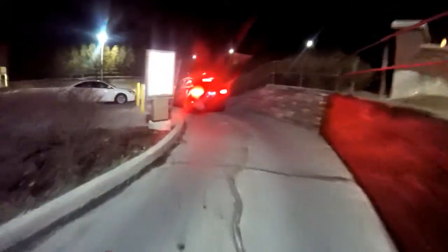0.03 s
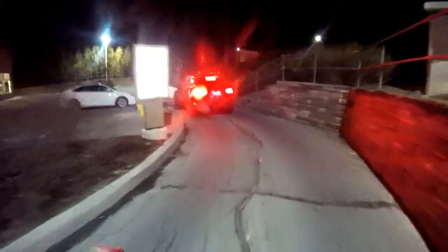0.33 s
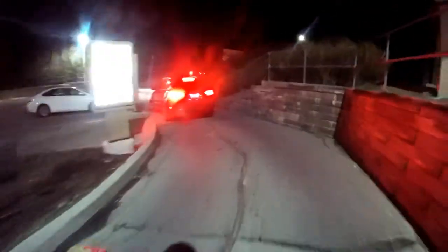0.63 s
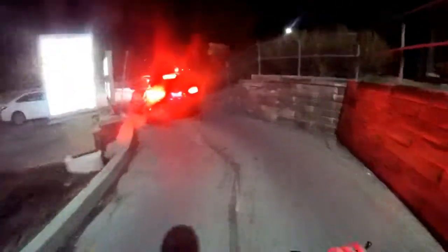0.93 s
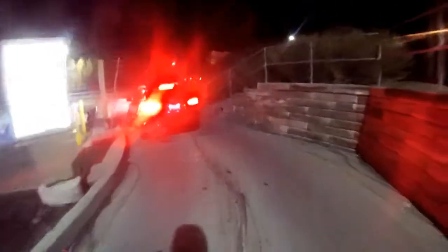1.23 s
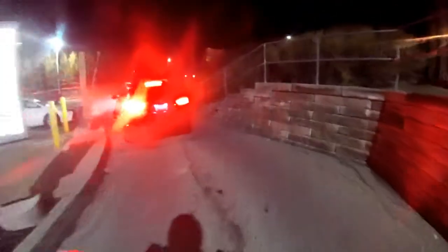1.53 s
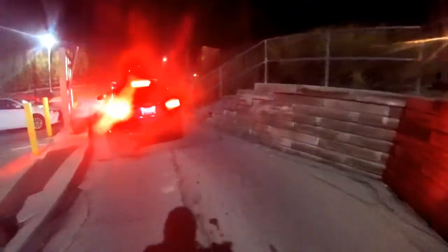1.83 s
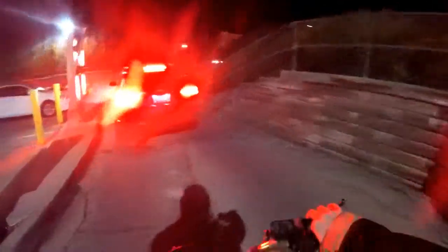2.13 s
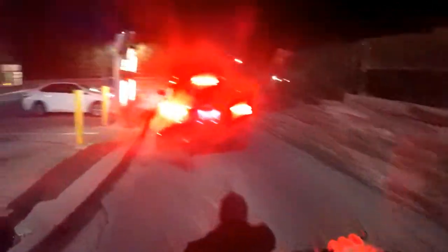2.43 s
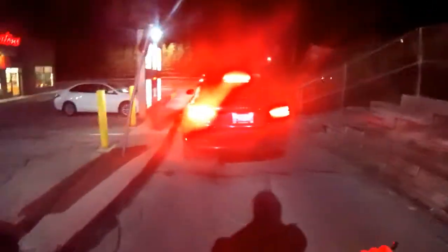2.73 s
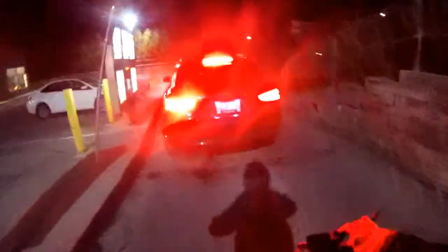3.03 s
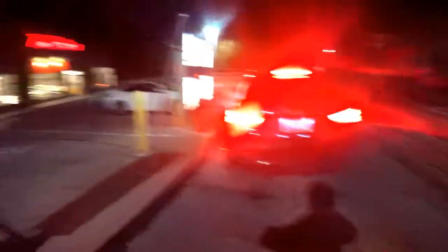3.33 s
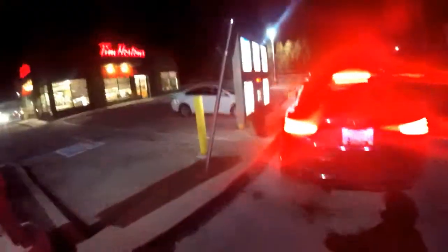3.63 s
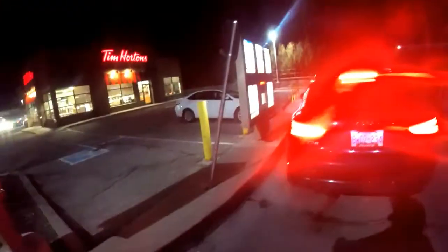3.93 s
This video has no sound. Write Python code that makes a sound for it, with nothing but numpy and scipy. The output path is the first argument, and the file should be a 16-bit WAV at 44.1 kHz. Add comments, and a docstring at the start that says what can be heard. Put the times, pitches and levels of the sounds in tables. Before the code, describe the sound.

A small motorbike engine ticks and rumbles, slowing towards idle as it rolls along.

```python
"""Motorbike in a lane

A small single-cylinder four-stroke rolls up a lane, revs sinking towards idle; microphone close, on
the rider's helmet. The case clatters, the crank throbs, air rumbles on the microphone, the exhaust
thuds unevenly, and once a cycle the valve gear gives a run of bright ticks. The frame bumps over road
joints, the drive gives one sharp clack, and late on the running gear squeaks faintly."""
import sys
import numpy as np
from scipy import signal
from scipy.fft import rfft, irfft
from scipy.io import wavfile
from scipy.ndimage import map_coordinates

SR = 44100
rng = np.random.default_rng(int(sys.argv[2]) if len(sys.argv) > 2 else 0)


def wav_out(sig):
    """Save sig, one row per channel (or a flat mono array), as 16-bit PCM at SR to the path in sys.argv[1]."""
    wavfile.write(sys.argv[1], SR, np.round(np.clip(np.atleast_2d(sig).T, -1, 1) * 32767).astype(np.int16))


N = 176400
TIME = np.arange(N) / SR
VALVES_OPEN, FIRES_AT = .325, .79  # shares of an engine cycle, from the first valve tick


def amp(db):
    """Decibels to gain."""
    return 10 ** (np.asarray(db) / 20)


def unit(x):
    """Scales to rms 1."""
    return x / np.sqrt(np.mean(x ** 2) + 1e-20)


def level(points):
    """A curve of dB over time as a gain per sample."""
    return amp(np.interp(TIME, *np.transpose(points)))


def colour(x, points):
    """Causal filter of energy 1: the points set only the shape of the spectrum."""
    f, db = np.transpose(points)
    hz = abs(np.fft.fftfreq(8192, 1 / SR))
    log_gain = np.log(amp(np.interp(np.log(hz + 1), np.log(f), db)))
    minimum_phase = np.exp(np.conj(signal.hilbert(log_gain)))
    response = np.fft.ifft(minimum_phase).real[:len(hz) // 2]
    return signal.fftconvolve(x, response / np.linalg.norm(response))[:N]


def blows(times, sizes):
    """A train of single impulses."""
    out, at = np.zeros(N), np.round(np.asarray(times) * SR).astype(int)
    inside = (at >= 0) & (at < N)
    np.add.at(out, at[inside], (sizes * np.ones(len(at)))[inside])
    return out


def scatter(x, t60, wet_db, count=5):
    """Each blow lands at one of several spots, each with its own short diffuse tail."""
    t, spot = TIME[:SR // 10], rng.integers(0, count, N)
    tails = rng.standard_normal((count, len(t))) * amp(-60 * t / t60)
    wet = sum(signal.oaconvolve(x * (spot == k), tail / np.linalg.norm(tail))[:N]
              for k, tail in enumerate(tails))
    return x + amp(wet_db) * wet


def mode(x, hz, t60):
    """One dying resonance; a unit blow rings with height 1."""
    r, angle = np.exp(-np.log(1000) / (t60 * SR)), 2 * np.pi * hz / SR
    return signal.lfilter([0, np.sin(angle)], [1, -2 * r * np.cos(angle), r * r], x + 1e-18)


def drift(rate_hz):
    """Smooth random wander of rms 1."""
    hz = np.fft.rfftfreq(N, 1 / SR)
    return unit(irfft(rfft(rng.standard_normal(N)) * np.exp(-(hz / rate_hz) ** 2), N))


def when(cycle, marks):
    """Times at which the engine reaches the given cycle counts."""
    return np.interp(marks, cycle, TIME, left=-1, right=-1)


def pelting(cycle, per_s=1700, spread_db=3.5, lift_db=1):
    """Dense tiny blows of chain and gears, a little harder while the valves work."""
    hits = (rng.random(N) < per_s / SR) * rng.choice([-1, 1], N)
    force = hits * amp(spread_db * np.clip(rng.standard_normal(N), -2, 2))
    return force * amp(lift_db * (cycle % 1 < VALVES_OPEN) + 1.6 * drift(rate_hz=33))


# resonances of the engine's metal: f/Hz, relative level/dB, t60/s
CASE_MODES = [(990, -39, 0.3), (1612.6, 8, 0.052), (2029, 3.5, 0.033), (2110, -4.5, 0.025), (2614, 4, 0.14),
              (2980, -14, 0.089), (3210, -5.5, 0.058), (5800, -16, .05), (6208, -14, 0.037)]

def case_ring(force, wander=.013):
    """The engine's metal rings, its pitch wavering slightly."""
    modes = sum(amp(db) * mode(force, hz, t60) / np.sqrt(t60) for hz, db, t60 in CASE_MODES)
    read_at = np.cumsum(1 + wander * drift(rate_hz=18))
    return map_coordinates(modes, [read_at], mode="mirror")


# spectrum of the case's rattle: f/Hz, relative level/dB
RATTLE_COLOUR = [(300, -9), (800, -20.5), (1330, -21.5), (1540, -18), (1640, -4.5), (1780, -8), (2050, 5),
                 (2370, -7), (2600, -1.5), (2760, -1), (3120, 3.5), (3350, -3), (3750, 3.5), (4200, -10),
                 (5200, -25), (5800, -9), (6200, -7), (6700, -17.5), (7200, -20.5), (8000, -16),
                 (10000, -26), (12500, -31.5), (15000, -75)]
# rattle and ring as heard at the helmet: t/s, level/dB
RATTLE_LEVEL = [(0, -42), (.3, -46), (.6, -44), (.73, -43.5), (.9, -46.5), (1.2, -46.5), (1.45, -50),
                (2.2, -50.5), (2.9, -53), (3.12, -54.5), (3.5, -54), (4, -53)]
RING_LEVEL = [(0, -43.5), (.3, -49.5), (.55, -50.5), (.76, -46.5), (.9, -53.5), (1.25, -51), (1.5, -55),
              (2.4, -54.5), (2.85, -53), (3.0, -51.5), (3.11, -52.5), (3.3, -52), (3.6, -55.5), (4, -53)]

def case_clatter(cycle):
    """Close below the rider, the engine case rattles and rings under the pelting."""
    rattle = colour(scatter(pelting(cycle), t60=0.031, wet_db=1), RATTLE_COLOUR)
    ring = case_ring(pelting(cycle))
    return unit(rattle) * level(RATTLE_LEVEL) + unit(ring) * level(RING_LEVEL)


# the crank's main tone: t/s, level/dB
THROB_LEVEL = [(0, -37), (.22, -45), (.37, -30), (.55, -53), (.68, -35), (.85, -59), (1.03, -35.5),
               (1.4, -60), (2.0, -48), (2.6, -48), (3.0, -49), (4, -59)]
# its partials: multiple of the cycle rate, level/dB at top revs, level/dB at idle
THROB_ORDERS = [(1, -76, -50.5), (3, -64, -44.5), (5, -72, -66), (6, -69, -60.5), (7, -69, -84)]

def crank_throb(cycle, rpm, phase_turns=0.16):
    """The crank throbs once a turn; most of its partials grow as the revs drop."""
    gain = level(THROB_LEVEL) * amp(1.7 * drift(rate_hz=24))
    crank = gain * np.cos(2 * np.pi * (2 * cycle + phase_turns))
    idle = (rpm.max() - rpm) / np.ptp(rpm)
    for order, fast_db, idle_db in THROB_ORDERS:
        db = fast_db + (idle_db - fast_db) * idle + 1.6 * drift(rate_hz=13)
        crank += amp(db) * np.cos(2 * np.pi * (order * cycle + rng.random()))
    return np.sqrt(2) * crank


# buffets on the microphone: t/s, level/dB
WIND_LEVEL = [(0, -52), (.7, -42.5), (1.0, -45), (1.3, -40.5), (1.58, -39.5), (1.8, -49.5), (2.65, -48),
              (2.83, -34.5), (3.0, -63), (3.42, -52), (3.45, -31.5), (3.51, -30.5), (3.54, -57), (4, -51.5)]
# spectra of the buffets and of tyres and street: f/Hz, relative level/dB
WIND_COLOUR = [(8, -2.5), (18, 0), (35, -2.5), (50, -12.5), (70, -25), (120, -28), (300, -42.5),
               (1000, -99)]
ROAD_COLOUR = [(30, -10), (70, -5), (115, 1), (160, -4), (240, -8), (330, -12), (500, -17.5), (800, -20),
               (1300, -26.5), (3000, -37), (12000, -46)]

def wind_and_road():
    """Air buffets the microphone itself, over the low wash of tyres and distant street."""
    wind = unit(colour(rng.standard_normal(N), WIND_COLOUR)) * level(WIND_LEVEL)
    road = unit(colour(rng.standard_normal(N), ROAD_COLOUR)) * amp(1.9 * drift(rate_hz=27))
    return wind + road * level([(0, -51), (1.1, -55), (1.7, -54), (4, -56.5)])


# strong firings: t/s, relative level/dB
STRONG_FIRINGS = [(0.018, -30), (.069, -19.5), (.273, -22), (0.431, -18.5), (0.486, -16), (.595, -16),
                  (.764, -13.5), (0.815, -22), (.876, -23), (.999, -14), (1.082, -20), (1.118, -14),
                  (1.304, -21.5), (1.501, -19), (1.788, -20), (1.937, -18), (2.068, -17), (2.2, -20.5),
                  (2.273, -19.5), (2.409, -17), (2.689, -17.5), (3.059, -22), (3.151, -25), (3.318, -18.5),
                  (3.692, -29), (3.751, -19), (3.900, -17.5)]
# spectrum of a thud: f/Hz, relative level/dB
EXHAUST_COLOUR = [(30, -5), (70, -3.5), (115, 7.5), (160, -0.5), (240, -3), (320, 3), (430, -8), (600, -21),
                  (1000, -21), (2000, -15), (5000, -84)]

def exhaust(cycle, puff_db=-29.5, echo_s=.0045, echo_db=-14.5):
    """A soft puff every cycle, and a full thud when the charge burns well."""
    puff_times = when(cycle, np.arange(int(cycle[-1]) + 1) + FIRES_AT)
    puffs = blows(puff_times, amp(puff_db + 4.0 * rng.standard_normal(len(puff_times))))
    times, db = np.transpose(STRONG_FIRINGS)
    thuds = blows(times, amp(db))
    echoes = blows(times + echo_s, amp(db + echo_db))  # thrown back along the pipe
    pulses = scatter(puffs + thuds + echoes, t60=0.053, wet_db=-2.5)
    return -amp(-0.5) * colour(pulses, EXHAUST_COLOUR)


# valve gear as heard at the helmet: t/s, relative level/dB
VALVE_LEVEL = [(0, -45), (.6, -44.5), (1.0, -47.5), (1.25, -44.5), (1.42, -46.5), (1.8, -42.5),
               (2.4, -42.5), (3.05, -43), (3.4, -45), (4, -46.5)]
# spectrum of a tick: f/Hz, relative level/dB
TICK_COLOUR = [(600, -34), (1300, -42.5), (1600, -6.5), (1800, -24), (2350, -24), (2620, -6), (2780, -3),
               (3150, 5.5), (3550, 1.5), (3800, -7.5), (4100, -19.5), (4450, -35), (4750, -29), (5200, -53),
               (5750, -31), (6200, -17.5), (6550, -23.5), (7100, -24), (7550, -22), (8400, -29.5),
               (9000, -29), (10200, -45), (11300, -40.5), (12400, -46), (13700, -38), (15000, -36)]
# parts of the valve gear, one rung by each tick: f/Hz, relative level/dB, t60/s
VALVE_MODES = [(2677, -1.5, 0.031), (2920, -7.5, 0.041), (3180, 1, 0.043), (3440, 0, 0.028),
               (3576, -2, 0.045), (3755, -4, 0.054), (6210, -12.5, 0.027), (7580, -17.5, 0.054)]

def valve_ticks(cycle, count=12, jitter=.25, spread_db=3.5, first_db=1):
    """A run of ticks each cycle while the cam works the valves; the first is firm and on time."""
    cycles = np.arange(int(cycle[-1]) + 1)[:, None]
    slip, size, side = rng.standard_normal((3, len(cycles), count))
    tick = np.arange(count)
    marks = cycles + VALVES_OPEN * (tick + jitter * slip * (tick > 0)) / (count - 1)
    tick_db = np.where(tick > 0, spread_db * np.clip(size, -2, 1), first_db)
    force = blows(when(cycle, marks.ravel()), (np.sign(side) * amp(tick_db)).ravel())
    part = rng.integers(0, len(VALVE_MODES), N)
    pings = sum(amp(db) * mode(force * (part == k), hz, t60)
                for k, (hz, db, t60) in enumerate(VALVE_MODES))
    pings = signal.sosfilt(signal.butter(2, 2160, "highpass", fs=SR, output="sos"), pings)
    ticks = colour(scatter(force, t60=0.042, wet_db=8, count=6), TICK_COLOUR)
    return (amp(-2.5) * unit(ticks) + amp(-5) * unit(pings)) * level(VALVE_LEVEL)


# jolts from the lane: t/s, relative level/dB
BUMPS = [(0.576, -18), (1.029, -25), (1.106, -20.5), (2.498, -20), (2.562, -28), (2.805, -23),
         (2.828, -23.5), (3.488, -30), (3.694, -21), (3.714, -25.5)]
# spectrum of the jolted frame: f/Hz, relative level/dB
BUMP_COLOUR = [(40, -33), (110, 3.5), (190, -5), (290, -12), (450, -13), (2000, -45)]

def frame_bumps():
    """Under the rider, the frame takes the joints in the road with dull bumps."""
    times, db = np.transpose(BUMPS)
    return colour(scatter(blows(times, amp(db)), t60=0.14, wet_db=-2.5), BUMP_COLOUR)


# metal knocks in the drive: t/s, relative level/dB
KNOCKS = [(.6505, -14), (0.6625, -14), (.6642, -10.5), (.6662, -5), (.6695, -10), (.6725, -11),
          (0.6756, -7.5), (.6795, -12), (0.687, -13)]
# their spectrum: f/Hz, relative level/dB
CLACK_COLOUR = [(300, -22), (700, -27), (1000, -31), (1350, -21), (1600, -4.5), (1760, -15.5), (2060, 3),
                (2350, -5.5), (2600, 3.5), (3000, -1), (3350, -14), (3780, 1.5), (4200, -16), (5200, -25.5),
                (5800, -15.5), (6200, -4), (6700, -30), (8300, -24.5), (10000, -34), (15000, -50)]
# their after-ring: f/Hz, relative level/dB, t60/s
CLACK_MODES = [(995, -54.5, 0.67), (2030, -29.5, 0.11), (6208, -50, 0.067)]

def drive_clack():
    """A quick cluster of knocks as the drive takes up its slack; the hardest leaves a faint ring."""
    times, db = np.transpose(KNOCKS)
    force = scatter(blows(times, amp(db)), t60=0.023, wet_db=4)
    hardest = blows([times[np.argmax(db)]], 0.86)
    ring = sum(amp(mode_db) * mode(hardest, hz, t60) for hz, mode_db, t60 in CLACK_MODES)
    return amp(-3.5) * colour(force, CLACK_COLOUR) + ring


# rubs in the running gear: t/s, length/s, first f/Hz, last f/Hz, level/dB
SQUEAKS = [(2.955, 0.062, 1347, 1135, -59), (3.052, 0.017, 1270, 1320, -57),
           (3.275, 0.062, 1530, 1496, -54.5), (3.45, 0.039, 1300, 1346, -59)]

def squeaks(roughness=0.0398):
    """Short, rough rubs, faint at the helmet, swell and fade on a gliding pitch."""
    out = np.zeros(N)
    waver = 1 + roughness * drift(rate_hz=199.5)
    for start, length, first_hz, last_hz, db in SQUEAKS:
        progress = np.clip((TIME - start) / length, 0, 1)
        hz = (first_hz + (last_hz - first_hz) * progress) * waver
        tone = np.sqrt(2) * np.sin(2 * np.pi * np.cumsum(hz) / SR)
        out += amp(db) * np.sin(np.pi * progress) * tone
    return out


# engine speed: t/s, speed/rpm
RPM = [(0.0, 2466), (0.25, 2280), (0.65, 2169), (0.95, 1973), (1.2, 2007), (1.4, 1820), (1.6, 1710),
       (1.82, 1562), (2.03, 1834), (2.3, 1741), (2.47, 1793), (2.6, 1648), (2.8, 1727), (3.03, 1404),
       (3.38, 1436), (3.68, 1345), (3.82, 1583), (4.0, 1647)]

def scene(start_cycle=.41, left_delay_s=2.27e-5):
    """Ticks and clatter come a touch later on the left; the bass sits in the centre."""
    rpm = np.interp(TIME, *np.transpose(RPM))
    cycle = start_cycle + np.cumsum(rpm / 60 / 2) / SR  # two crank turns to a cycle
    metal = valve_ticks(cycle) + case_clatter(cycle) + drive_clack() + squeaks()
    bass = exhaust(cycle) + crank_throb(cycle, rpm) + frame_bumps() + wind_and_road()
    metal_left = np.interp(TIME - left_delay_s, TIME, metal)
    return np.array([metal_left, metal]) + bass


def record(dry, edge_hz=14800):
    """The recorder's band limit."""
    lowpass = signal.firwin(511, edge_hz, window=("kaiser", 9), fs=SR)
    return signal.oaconvolve(dry, lowpass[None], "same")


dry = scene()
out = record(dry)
wav_out(out)
```